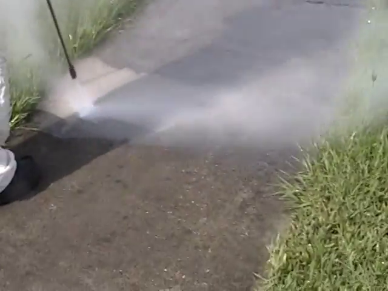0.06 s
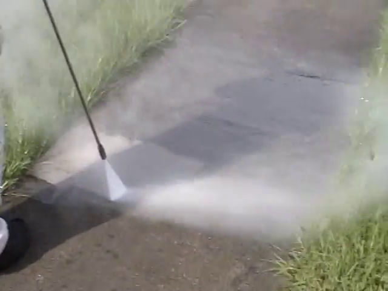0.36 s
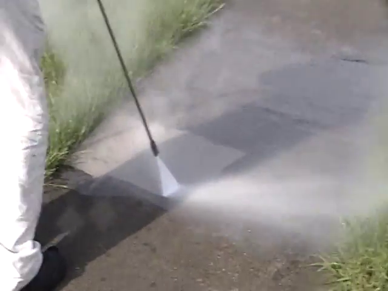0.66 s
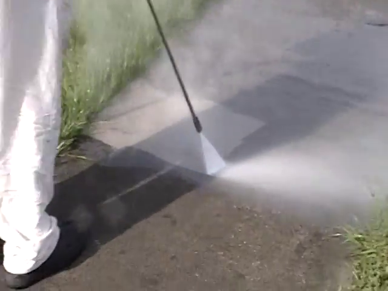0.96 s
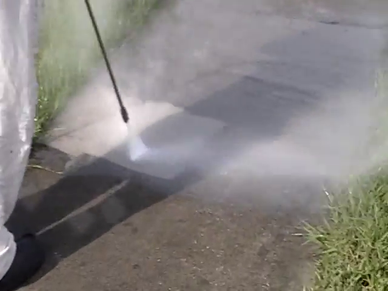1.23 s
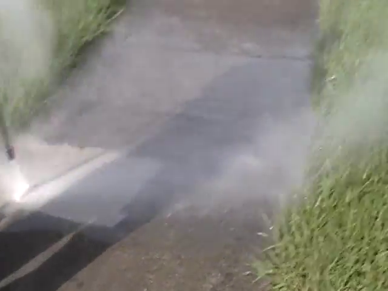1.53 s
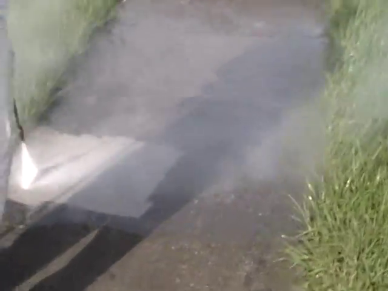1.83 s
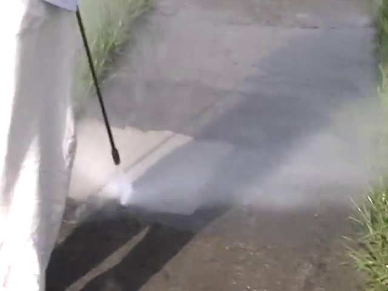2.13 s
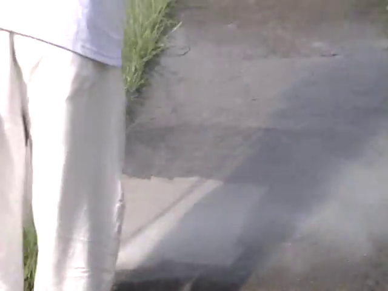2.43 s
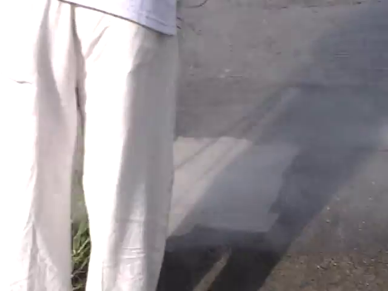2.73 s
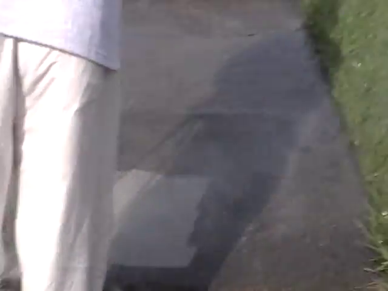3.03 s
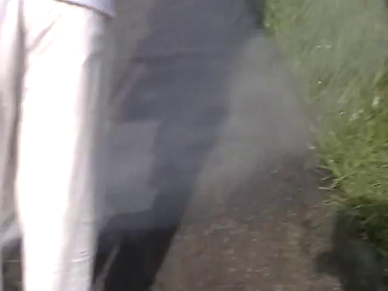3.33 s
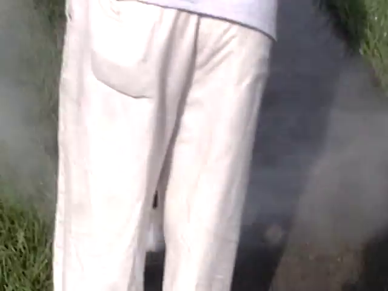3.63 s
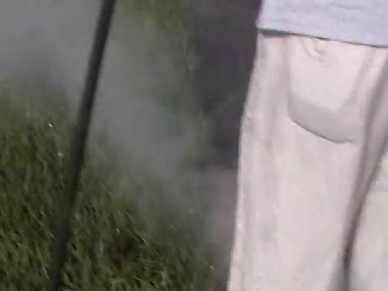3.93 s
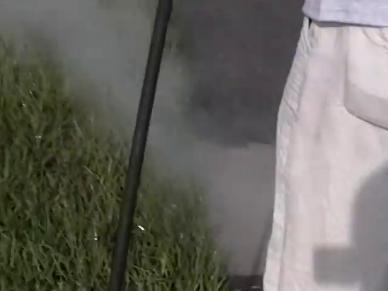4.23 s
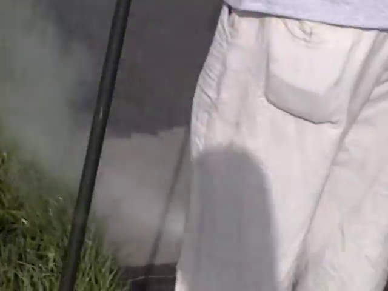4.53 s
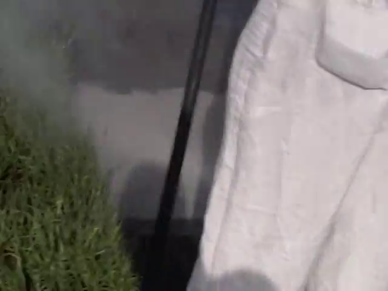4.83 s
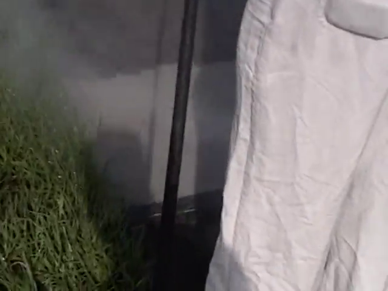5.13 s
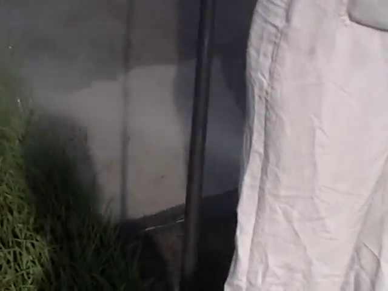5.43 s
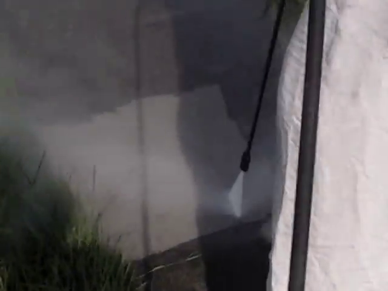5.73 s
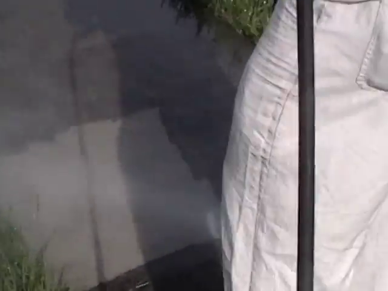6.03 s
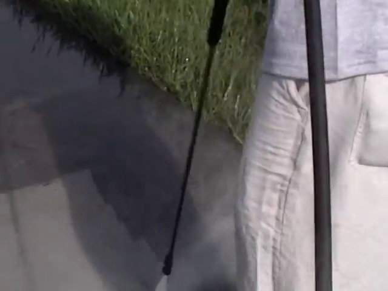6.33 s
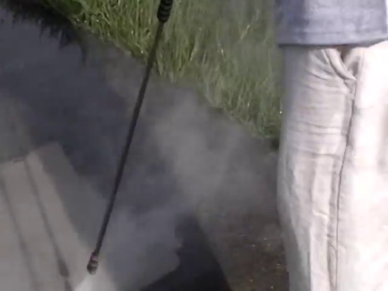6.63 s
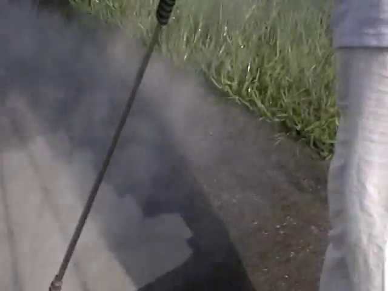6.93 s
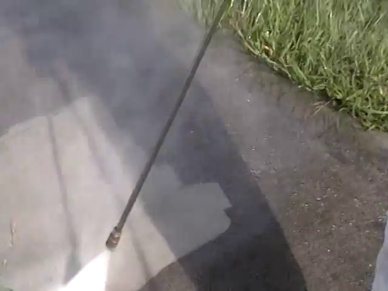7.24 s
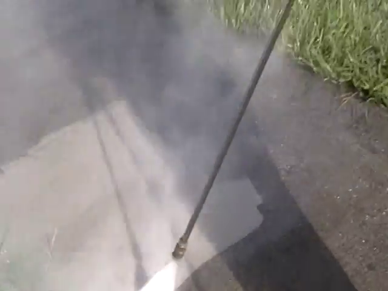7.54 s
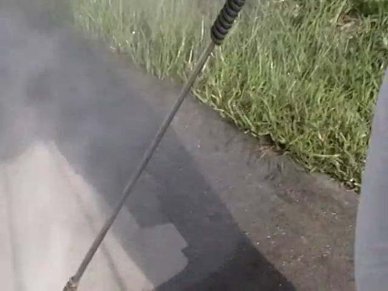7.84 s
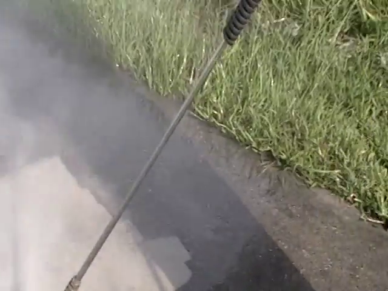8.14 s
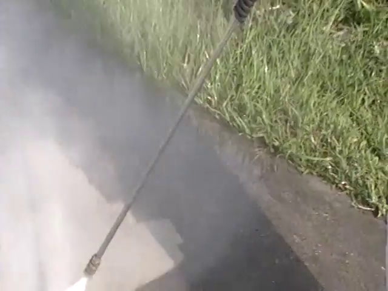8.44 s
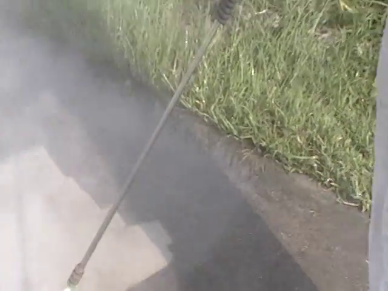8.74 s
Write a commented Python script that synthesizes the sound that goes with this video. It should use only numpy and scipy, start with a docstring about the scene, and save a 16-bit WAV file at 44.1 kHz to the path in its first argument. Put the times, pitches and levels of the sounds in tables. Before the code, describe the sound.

Outdoors, a fan of water hisses and roars on paving close by from start to finish, above the faint low hum of a pressure washer's engine and pump. The spray changes colour as it sweeps, dulling for a moment behind the worker's legs. In the middle the engine booms a little more and soft wind brushes the microphone, then the motor drops back beneath the steady jet.

```python
"""Pressure washing a sidewalk

A fan of water hisses and roars on concrete a few steps away, pulsing faintly with the pump and
coloured by a short echo that moves with the wand. It bites and swooshes at joints and edges, and the
worker's legs briefly muffle it. The petrol engine and its pump drone further off, the jet drags
puffs of air along, and a few gusts touch the microphone."""
import sys
import numpy as np
from scipy import signal
from scipy.fft import rfft, irfft, next_fast_len
from scipy.io import wavfile
from scipy.ndimage import uniform_filter1d, map_coordinates

SR = 44100
rng = np.random.default_rng(int(sys.argv[2]) if len(sys.argv) > 2 else 0)


def int16_out(signal):
    """Quantize to a 16-bit WAV file."""
    q = np.round(np.clip(np.atleast_2d(signal).T, -1, 1) * 32767)
    wavfile.write(sys.argv[1], SR, q.astype(np.int16))


N = 386757
JET_DB = -15  # base level of the jet on plain paving

# tone of water hitting concrete: (frequency [Hz], level [dB])
SPRAY_TONE = [(200, -38), (330, -20.5), (450, -12), (650, -6), (900, -3), (1170, -3), (1600, -0.8),
              (2000, -2), (2500, -2), (3400, -3.5), (4900, -6), (7600, -1), (10500, 0.5), (12000, -1.55),
              (13500, -3.5), (16000, -8)]
# rise and fall of the jet's low roar: (time [s], level [dB])
ROAR_LEVEL = [(0, 1.5), (.85, 2.5), (1.68, -1.4), (2.4, -2), (2.7, 1.5), (3.27, -2), (3.8, -1), (4.31, -.7),
              (5.27, 3), (5.79, -2.5), (6.5, .3), (6.95, -0.5), (7.6, 0), (8.77, 1)]
# the jet bites into the paving (+) or skims it (-): (time [s], length [s], strength [dB])
JET_BITES = [(2.53, 0.13, 2.5), (3, .24, 5), (4.44, .12, 1.5), (5.08, .14, 0.8), (5.4, .13, 2),
             (5.67, 0.17, -2), (6.15, 0.28, 3), (6.32, 0.11, -1.5), (7.09, 0.13, 1.3), (8.25, 0.17, 1),
             (8.54, 0.21, -1.2), (8.74, .14, 1)]
# how openly the machine is heard as the listener moves round the worker: (time [s], level [dB])
MACHINE_LEVEL = [(0, 0), (1.1, -.8), (2.1, .5), (2.6, 3.5), (3, 2.5), (3.5, .5), (4.2, 2.5), (5.3, 4),
                 (5.8, -.5), (6.2, 2.5), (6.9, -10), (8, -5), (8.77, -6)]


def amp(db):
    """Turn decibels into a gain."""
    return 10 ** (np.asarray(db) / 20)


def unit(x):
    """Scale a signal to an average (rms) level of 1."""
    return x / np.sqrt(np.mean(x ** 2) + 1e-20)


def along(points, hz):
    """Read between (frequency, value) points on a pitch-like (log) scale."""
    freqs, values = np.transpose(points)
    return np.interp(np.log(hz + 1), np.log(freqs + 1), values)


def curve(points):
    """Join (time, value) points with straight lines, one value per sample."""
    return np.interp(np.arange(N) / SR, *np.transpose(points))


def wobble(rate):
    """A smooth random curve through `rate` new values a second."""
    return map_coordinates(rng.standard_normal(int(N * rate / SR) + 4), [np.arange(N) * rate / SR])


def swell(t, centre, length):
    """A rounded rise and fall: half a sine wave."""
    return np.sin(np.pi * np.clip((t - centre) / length + .5, 0, 1))


def swells(rows, t):
    """Add up swells given as (time, length, height)."""
    return sum(height * swell(t, centre, length) for centre, length, height in rows)


def held(t, start, end, attack, release):
    """Rise from 0 to 1, hold, and fall back; times in seconds."""
    return np.clip((t - start) / attack + .5, 0, 1) * np.clip((end - t) / release + .5, 0, 1)


def filtered(x, response):
    """Scale each frequency in x by response(frequency)."""
    size = next_fast_len(N + SR // 4)
    return irfft(rfft(x, size) * response(np.fft.rfftfreq(size, 1 / SR)), size)[..., :N]


def spread(pair, tone):
    """Give two white noises a tone and blend them into a similar left and right."""
    # how alike left and right are: (frequency [Hz], likeness [0 to 1])
    likeness = [(60, 1), (250, 0.93), (640, 0.99), (1500, 1), (3000, .999), (5000, 0.96), (9000, 1),
                (15000, 0.88)]

    def response(hz):
        angle = np.arccos(np.clip(along(likeness, hz), -1, 1)) / 2
        return amp(along(tone, hz)) * np.array([np.cos(angle), np.sin(angle)])

    mid, side = filtered(pair, response)
    return np.array([mid + side, mid - side])


def resonances(rows, hz, t):
    """Gain in dB of peaks and dips in the tone that swell, glide and fade."""
    db = np.zeros((len(hz), len(t)))
    for centre, length, start_hz, end_hz, width, peak_db in rows:
        progress = np.clip((t - centre) / length + .5, 0, 1)
        glide_hz = start_hz * (end_hz / start_hz) ** progress
        octaves = np.log2((hz[:, None] + 1) / glide_hz)
        db += peak_db * swell(t, centre, length) * np.exp(-.5 * (octaves / width) ** 2)
    return db


def turning(hz):
    """Phase of a machine's cycle, its speed drifting very slightly."""
    speed = hz * (1 + .002 * wobble(2))
    return 2 * np.pi * (np.cumsum(speed) / SR + rng.random())


def drone(phase, harmonics, waver_db, jitter):
    """Tones at multiples of a machine's rate, each wavering in strength and phase."""
    total = 0
    for multiple, db in harmonics:
        gain = amp(db + waver_db * wobble(4.6))
        total += gain * np.sin(multiple * phase + jitter * wobble(8.4) + 2 * np.pi * rng.random())
    return np.sqrt(2) * total


def engine(firing_hz, throb_db, boom_db, beat_db, rumble_db):
    """A four-stroke engine throbs as it fires; its fifth harmonic beats against the pump's hum."""
    # the engine's low throb: (multiple of the firing rate, level [dB])
    throb_tones = [(2, 2), (3, 3.5), (4, 1)]
    # the exhaust's boom: (multiple of the firing rate, level [dB])
    boom_tones = [(6, 1), (8, -5.5), (9, -12)]
    # the engine's noisy rumble: (frequency [Hz], level [dB])
    rumble_tone = [(25, -28), (50, -23), (70, -16), (82, 5), (95, -6), (125, -1), (200, 0.5), (260, -1.5),
                   (380, -10.5), (700, -47)]
    open_db = curve(MACHINE_LEVEL)
    # the exhaust booms for a while, as the way to the machine lies open
    booming = held(np.arange(N) / SR, start=4.07, end=6.35, attack=.08, release=.5)
    boom_gain = amp(boom_db + .53 * open_db + 8.5 * booming)
    firing = turning(firing_hz)
    throb = amp(throb_db) * drone(firing, throb_tones, waver_db=.5, jitter=.06)
    boom = boom_gain * drone(firing, boom_tones, waver_db=2.5, jitter=.25)
    beat = amp(beat_db + open_db) * drone(firing, [(5, 0)], waver_db=1, jitter=.13)
    rumble = amp(rumble_db) * unit(spread(rng.standard_normal((2, N)), rumble_tone))
    return amp(.59 * open_db) * (throb + rumble) + boom + beat


def pump(stroke, hum_db, overtone_db):
    """The pump hums at one, two and three times the rate of its piston strokes."""
    open_db = curve(MACHINE_LEVEL)
    hum = amp(hum_db + open_db) * drone(stroke, [(1, -12), (2, -.5)], waver_db=.5, jitter=.1)
    overtone = amp(overtone_db + 1.7 * open_db) * drone(stroke, [(3, 0)], waver_db=4, jitter=.2)
    return hum + overtone


def breeze(steady_db, shared_db, lumpy_db):
    """Gusts buffet the microphone, mostly pushing one side while they pull the other."""
    # gusts of wind: (time [s], length [s], level [dB])
    gust_list = [(4.05, .12, -44), (4.21, .14, -40), (4.5, .2, -37.5), (4.864, 0.092, -40), (5.05, .2, -41),
                 (5.343, .16, -39), (5.467, 0.12, -32), (5.61, 0.3, -36), (6.182, 0.24, -33),
                 (7.15, 0.31, -37), (7.407, .14, -45)]
    # wind rumbling on the microphone: (frequency [Hz], level [dB])
    wind_tone = [(25, -28), (50, -18), (85, 0), (150, -2.5), (250, -6.5), (400, -17.5), (700, -26),
                 (1500, -50)]
    t = np.arange(N) / SR
    steady = amp(steady_db) * held(t, start=3.9, end=6.35, attack=.2, release=.2)
    gusts = swells([(centre, length, amp(db)) for centre, length, db in gust_list], t)
    shared, opposed = unit(filtered(rng.standard_normal((2, N)), lambda hz: amp(along(wind_tone, hz))))
    shared = amp(shared_db) * shared
    strength = np.hypot(steady, gusts) * amp(lumpy_db * wobble(25))
    return strength * np.array([shared + opposed, shared - opposed])


def draught(base_db, gust_db):
    """Air dragged along by the jet follows its roar and puffs over the ground."""
    # puffs toward the microphone: (time [s], length [s], boost [dB])
    puffs = [(2.7, 0.65, 5), (4.35, .9, 5), (5.35, 0.33, 4.5), (7.2, .16, 6), (8.15, 0.99, 8),
             (8.68, 0.36, 8)]
    # tone of the moving air: (frequency [Hz], level [dB])
    air_tone = [(120, -25), (260, 2), (400, -1.5), (550, -3), (900, -36)]
    t = np.arange(N) / SR
    roar_db = curve(ROAR_LEVEL) + swells(JET_BITES, t)
    level_db = base_db + .6 * roar_db + swells(puffs, t) + gust_db * wobble(9)
    return amp(level_db) * unit(spread(rng.standard_normal((2, N)), air_tone))


def scattered_hiss():
    """Hiss that bends round the worker's legs arrives differently on the left and right."""
    # what survives the detour: (frequency [Hz], gain [dB])
    detour_tone = [(400, -11), (1000, -18), (2500, -19), (4500, -18.5), (9000, -41)]
    # how much goes that way, most while the legs hide the jet: (time [s], level [dB])
    detour_level = [(0, -1), (2.8, -3), (3.3, 0.5), (4.1, -4), (4.5, -16), (6, -25)]
    hiss = unit(filtered(rng.standard_normal(N), lambda hz: amp(along(SPRAY_TONE, hz))))
    side = filtered(hiss, lambda hz: amp(JET_DB + along(detour_tone, hz))) * amp(curve(detour_level))
    return np.array([side, -side])


def microphone_ports(pair):
    """Sound from the side makes the microphone's two openings ring, one pushing as the other pulls."""
    # where the jet lies: (time [s], direction [-1 right to 1 left])
    direction = [(0, 0.77), (.9, 0.26), (1.3, 0.54), (1.7, 0.9), (2.3, 0.41), (2.7, 0.76), (3.3, 1),
                 (3.65, 0.19), (4.15, -0.7), (4.7, 0.37), (5.05, -0.24), (6.3, -0.028), (6.9, 0.65),
                 (7.5, 0.35), (8, 0.63), (8.77, 0.51)]
    # ringing of the openings: (frequency [Hz], width [Hz], level [dB])
    rings = [(4550, 450, -6), (13900, 1800, 1)]

    def response(hz):
        total = 0
        for ring_hz, width, db in rings:
            bass_cut = np.minimum(1, (hz + 1) / ring_hz) ** 5.3
            total -= amp(db) * bass_cut * hz * width / (ring_hz ** 2 - hz ** 2 + 1j * hz * width)
        return total

    side = curve(direction) * filtered(pair.mean(axis=0), response)
    return pair + np.array([side, -side])


def paving_echo(pair, gain):
    """The paving returns a dull copy, which cancels some pitches of the hiss and lifts others."""
    # the echo comes later or sooner as the wand moves: (time [s], delay [ms])
    delay_ms = [(0, 1.06), (1.05, 1.07), (1.7, 1.17), (2.2, 1.42), (2.8, 1.25), (3.8, 1.22), (4.6, 1.285),
                (5.15, 1.23), (5.65, 1.37), (6.35, 1.32), (6.85, 1.2), (7.05, 1.11), (7.4, 1.19),
                (7.9, 1.19), (8.25, 1.055), (8.77, .99)]
    # tone of the echo: (frequency [Hz], gain [dB])
    echo_tone = [(600, -2.5), (2000, 0), (5500, -1), (8000, 4), (13000, -14)]
    dull = filtered(pair, lambda hz: amp(along(echo_tone, hz)))
    read_at = np.arange(N) - curve(delay_ms) * SR / 1000
    return pair + gain * np.array([map_coordinates(channel, [read_at], order=3) for channel in dull])


def surroundings(hz, t):
    """Gain in dB on the way to the microphone: hollow spaces colour the hiss and legs block it."""
    # slow resonances of the space between wand, legs and paving:
    # (time [s], length [s], start [Hz], end [Hz], width [octaves], gain [dB])
    hollows = [(.65, 1.9, 1990, 1850, .075, 3.7), (.6, 2.1, 2900, 2750, 0.15, 1.5),
               (1, 2.1, 1590, 1480, .16, -3.7), (2.15, 0.77, 1850, 1780, 0.098, -5),
               (4.71, 5.4, 1560, 1470, 0.083, 2.5), (4.01, 1.8, 1010, 1090, .12, 5.5),
               (4.2, 0.65, 1900, 1900, .08, -5), (5.22, 1, 1040, 1040, .17, 4.5),
               (6.65, 0.93, 755, 720, .5, -2.5), (7.13, 0.31, 870, 830, .19, 5.5),
               (8.28, 1.4, 700, 790, .21, 3.5)]
    # muffling by the legs, which move in slowly and step clear at once: (frequency [Hz], gain [dB])
    leg_shadow = [(1500, -0.5), (2400, -3), (3300, -5.5), (4500, -8.5), (5800, -9.5), (7500, -3),
                  (10000, 0)]
    hidden = held(t, start=2.88, end=4.41, attack=.38, release=.05)
    return resonances(hollows, hz, t) + np.outer(along(leg_shadow, hz), hidden)


def impact(hz, t, roar_below_hz=2030, mist_above_hz=10600):
    """Gain in dB from how the jet meets the paving: roar, mist, bites, edges and swooshes."""
    # the fine mist's high hiss: (time [s], level [dB])
    mist_level = [(0, 0.5), (1.06, 1.2), (1.85, 0), (2.25, 3), (2.7, 0.5), (3.75, 3), (4.36, 3),
                  (4.98, -0.2), (5.65, 4), (6.8, 2.3), (8.17, -1), (8.77, 1)]
    # a bite trades mist for roar: (frequency [Hz], gain [dB per dB of bite])
    bite_tone = [(700, 1.07), (1600, 1), (3500, 0.63), (8000, -0.35), (14000, -1.4)]
    # the jet crosses an edge and a dip sweeps upward:
    # (time [s], length [s], start [Hz], end [Hz], depth [dB])
    edges = [(2.465, .2, 4200, 10500, 6), (4.425, .15, 5500, 13000, 6), (5.405, 0.098, 10500, 14500, 3.5)]
    # passing resonances at joints and hollows:
    # (time [s], length [s], start [Hz], end [Hz], width [octaves], gain [dB])
    swooshes = [(1.5, .25, 2700, 2600, .3, 1.5), (1.83, .33, 3940, 3120, 0.2, -4.5),
                (2.08, 0.49, 6500, 3000, 0.22, 3.5), (3.02, 0.32, 2400, 2100, .7, 3.2),
                (3.82, 0.31, 1300, 1350, 0.37, 2), (4.22, .14, 1400, 1400, .35, 1.5),
                (4.3, 0.38, 2900, 2800, .25, -3), (4.5, .13, 7500, 9000, 0.47, 1),
                (4.66, .35, 2650, 2690, .39, 2.5), (4.96, 0.46, 3660, 6540, .3, 3.5),
                (5.21, 0.64, 10900, 11400, .08, -5), (5.26, 0.32, 4270, 4500, 0.52, -4.5),
                (5.5, 0.3, 6250, 3000, 0.23, 5), (5.78, 0.24, 2980, 2870, 0.27, -6),
                (5.99, .22, 4000, 8000, 0.3, -4.5), (6.16, 0.41, 3810, 3450, 0.21, 4.5),
                (7.05, .4, 3800, 3300, .4, -2), (7.45, 0.41, 4030, 2420, 0.37, 2.5)]
    roar_band = 1 / (1 + (hz / roar_below_hz) ** 3)
    mist_band = 1 - 1 / (1 + (hz / mist_above_hz) ** 6)
    roar = np.outer(roar_band, np.interp(t, *np.transpose(ROAR_LEVEL)))
    mist = np.outer(mist_band, np.interp(t, *np.transpose(mist_level)))
    bites = np.outer(along(bite_tone, hz), swells(JET_BITES, t))
    octaves, lag_s = .4, .054  # each dip is followed closely by a slightly smaller peak
    dips = [(at, length, low, high, octaves, -db) for at, length, low, high, db in edges]
    peaks = [(at + lag_s, length, low, high, octaves, .75 * db) for at, length, low, high, db in edges]
    return roar + mist + bites + resonances(dips + peaks, hz, t) + resonances(swooshes, hz, t)


def droplets(per_second, size_spread_db, share):
    """White noise with a patter of single drop impacts in it."""
    hits = rng.random(N) < per_second / SR
    sizes = amp(size_spread_db * rng.standard_normal(N))
    drops = unit(hits * sizes * rng.standard_normal((2, N)))
    return rng.standard_normal((2, N)) + share * drops


def jet(stroke, patchy_db, pulse_depth, flutter_db):
    """Spray shatters on concrete; how it lands and what lies in its way colour the hiss."""
    patter = droplets(per_second=4000, size_spread_db=1.5, share=.45)
    spray = unit(paving_echo(spread(patter, SPRAY_TONE), gain=.13))
    # cut the sound into short slices, so that its tone can change over time
    hz, t, slices = signal.stft(spray, SR, nperseg=512)
    # random patches, smoothed over frequency and then time, make the hiss uneven
    patches = uniform_filter1d(rng.standard_normal(slices.shape[1:]), size=15, axis=0)
    patches = unit(uniform_filter1d(patches, size=9, axis=1))
    slices = slices * amp(JET_DB + impact(hz, t) + surroundings(hz, t) + patchy_db * patches)
    hiss = signal.istft(slices, SR, nperseg=512)[1][:, :N]
    pulse = 1 + pulse_depth * np.cos(stroke)  # each piston stroke lifts the pressure a little
    return hiss * pulse * amp(flutter_db * wobble(30))


def scene():
    """The machine off to the left, moving air, and the jet in front."""
    stroke = turning(hz=75.9)  # the pump's pistons
    machine = engine(firing_hz=29.55, throb_db=-51, boom_db=-51.5, beat_db=-47.5, rumble_db=-42.5)
    machine += pump(stroke, hum_db=-41.5, overtone_db=-46.5)
    shift_radians = .086  # left ahead, right behind: the drone reaches the left first
    machine = filtered(machine, lambda hz: np.exp(1j * shift_radians * np.array([[1], [-1]])))
    water = jet(stroke, patchy_db=.84, pulse_depth=.019, flutter_db=.32)
    air = draught(base_db=-45, gust_db=1.3) + breeze(steady_db=-49, shared_db=-2, lumpy_db=.8)
    return machine + air + scattered_hiss() + microphone_ports(water)


def record(dry):
    """The microphone leans slightly left, rounds off the tallest peaks and cuts the highest treble."""
    # balance of the two sides: (frequency [Hz], left minus right [dB])
    balance = [(60, 0), (200, .9), (600, 1.9), (1300, 0.35), (3000, -0.7), (6000, 1), (9000, 0.4),
               (15000, 0.8)]
    ceiling, top_hz = .88, 15900
    sound = filtered(dry, lambda hz: amp(along(balance, hz) * np.array([[.5], [-.5]])))
    sound = sound / (1 + (sound / ceiling) ** 8) ** (1 / 8)
    return filtered(sound, lambda hz: hz < top_hz)


dry = scene()
out = record(dry)
int16_out(out)
```